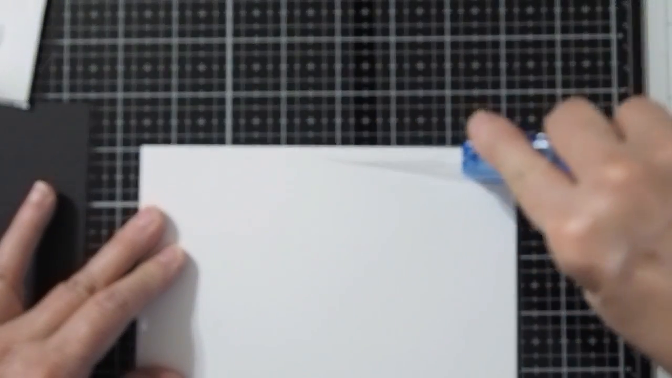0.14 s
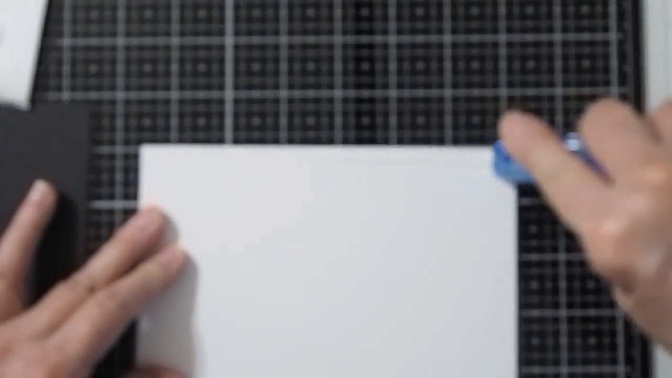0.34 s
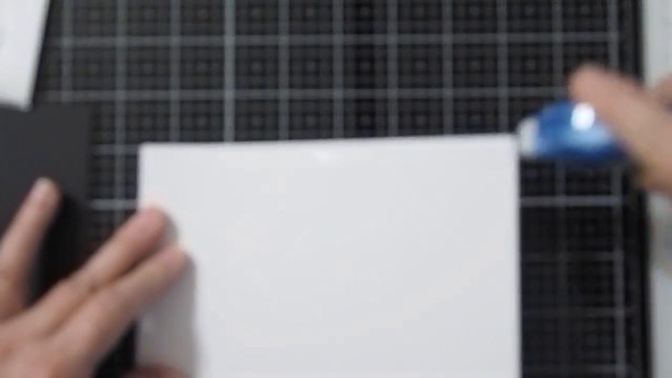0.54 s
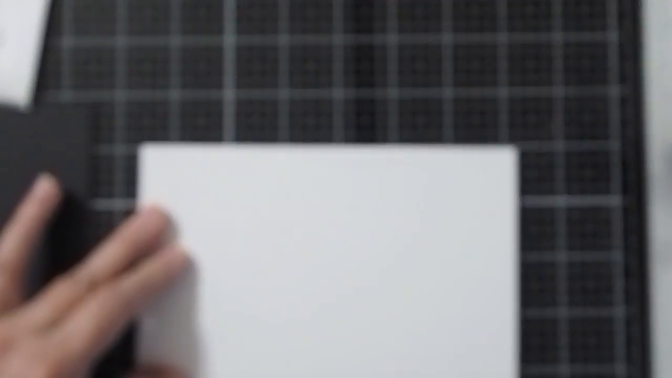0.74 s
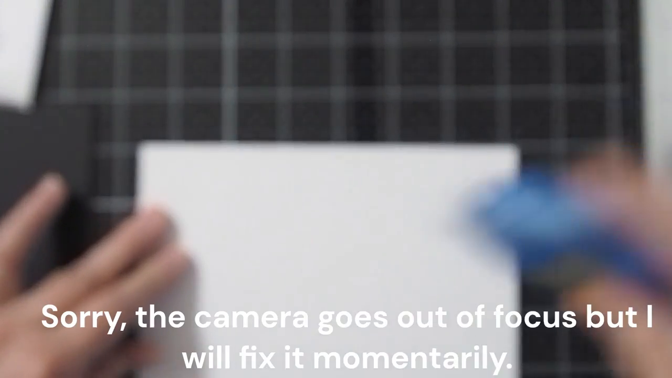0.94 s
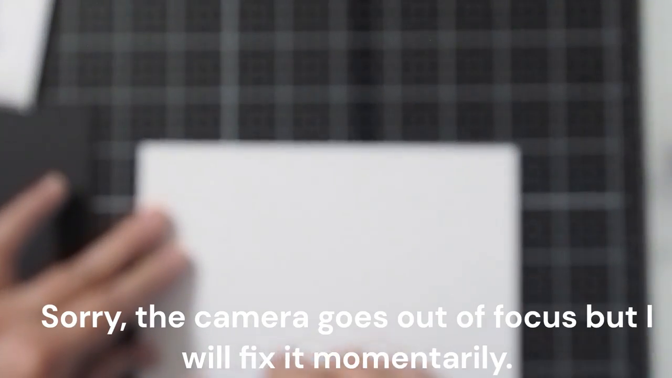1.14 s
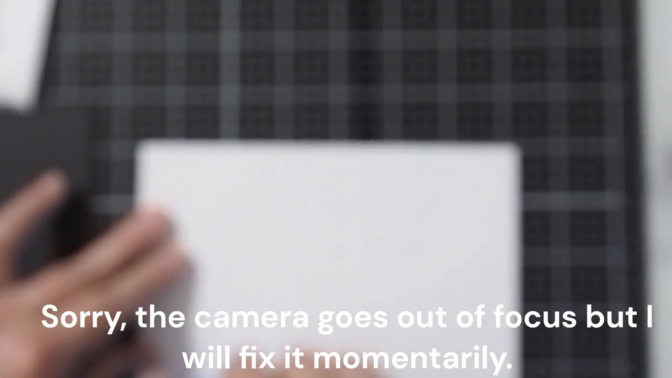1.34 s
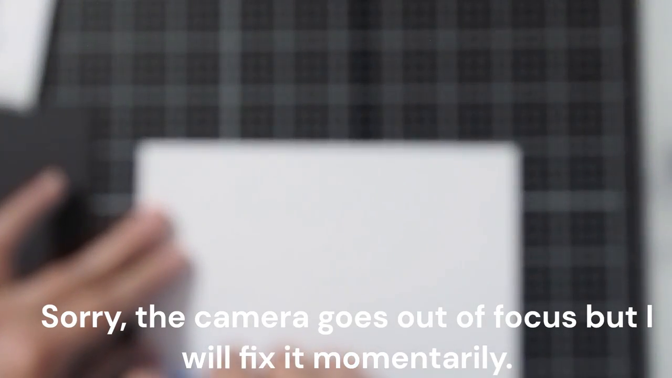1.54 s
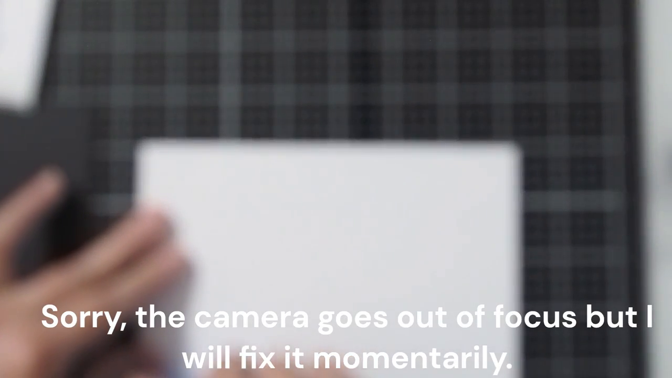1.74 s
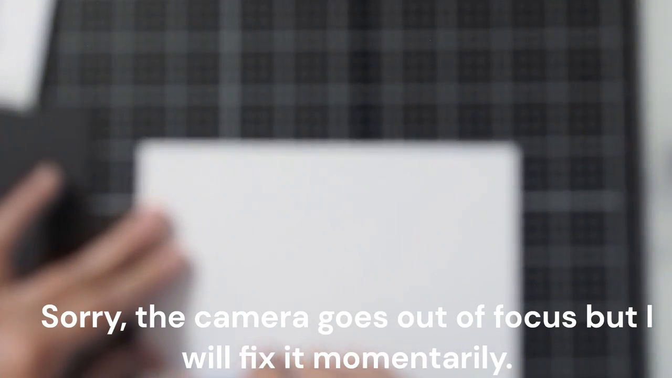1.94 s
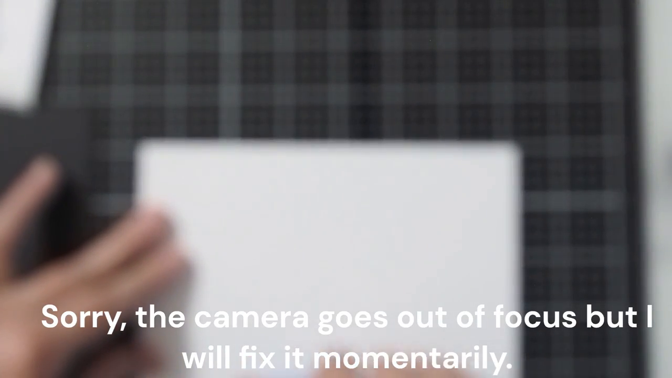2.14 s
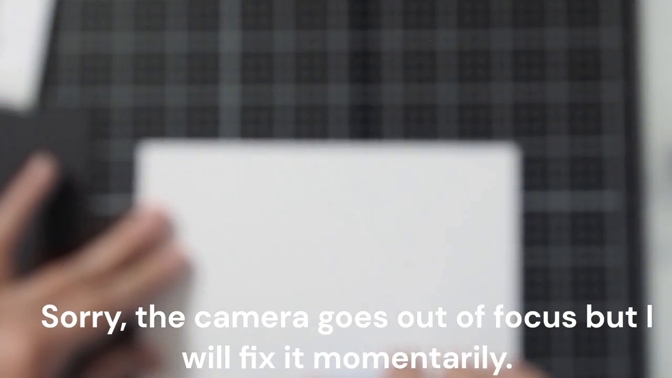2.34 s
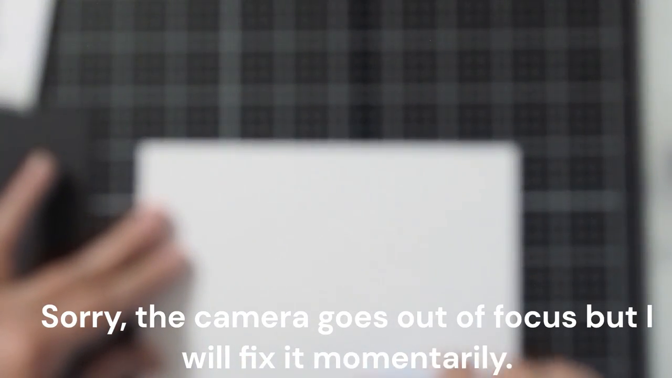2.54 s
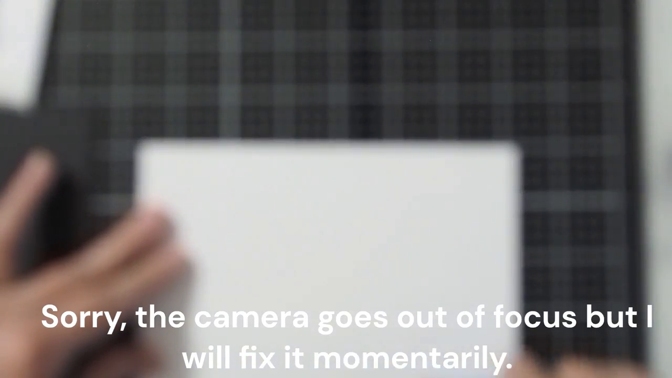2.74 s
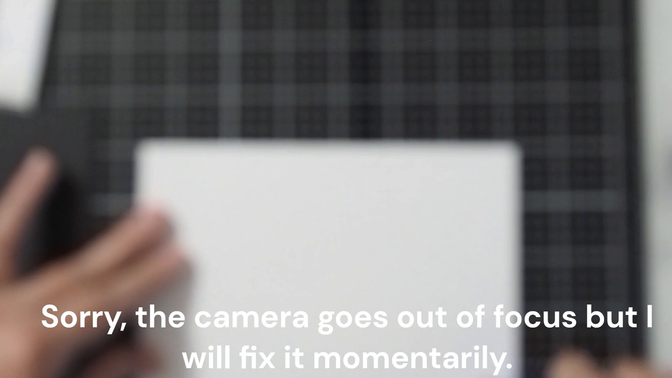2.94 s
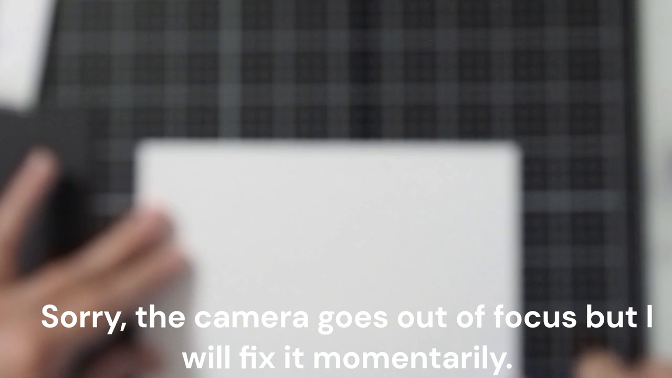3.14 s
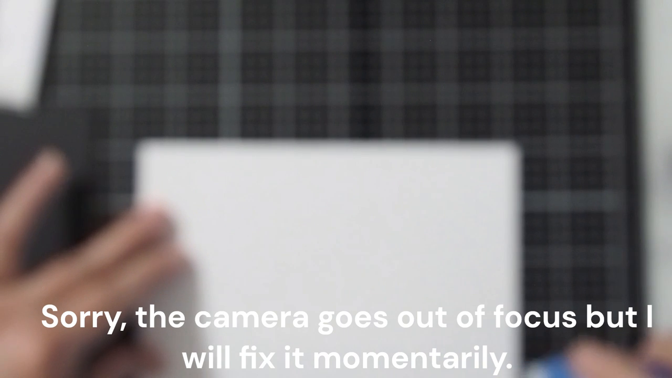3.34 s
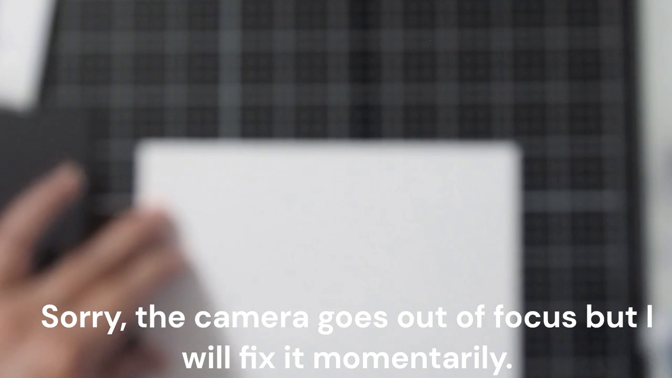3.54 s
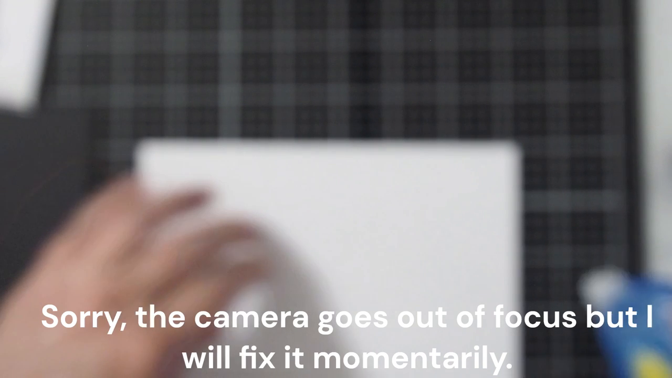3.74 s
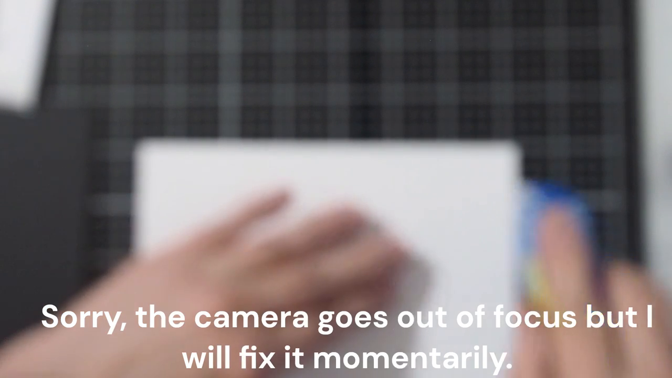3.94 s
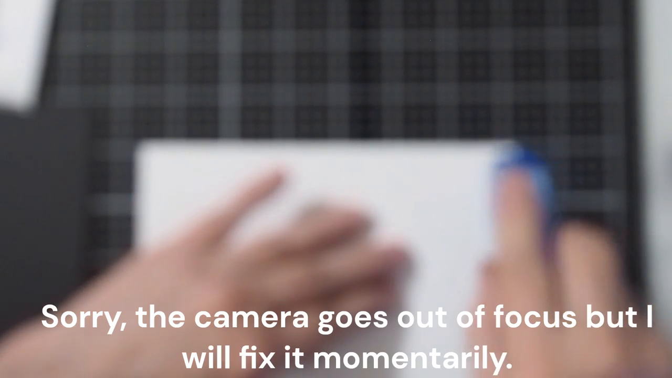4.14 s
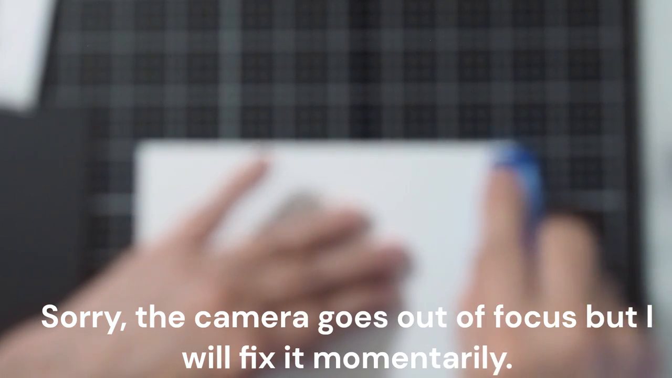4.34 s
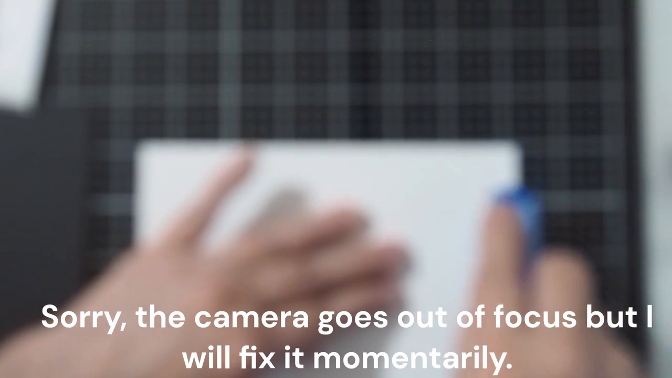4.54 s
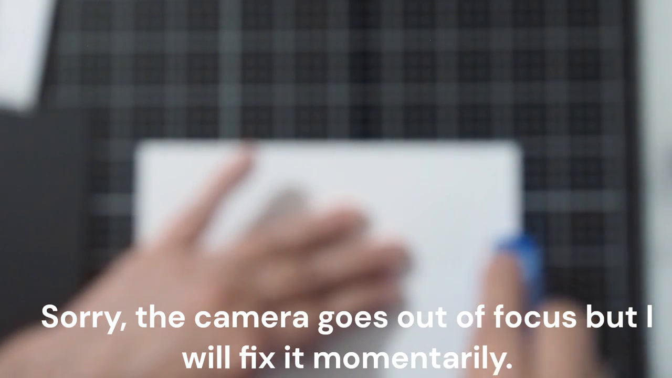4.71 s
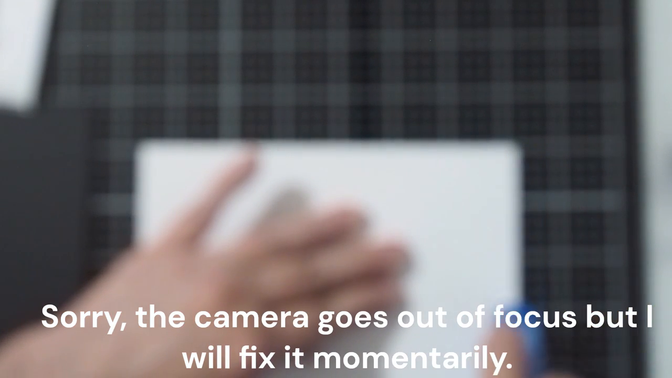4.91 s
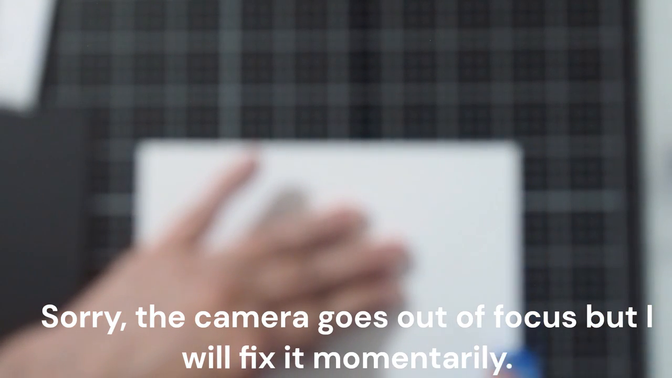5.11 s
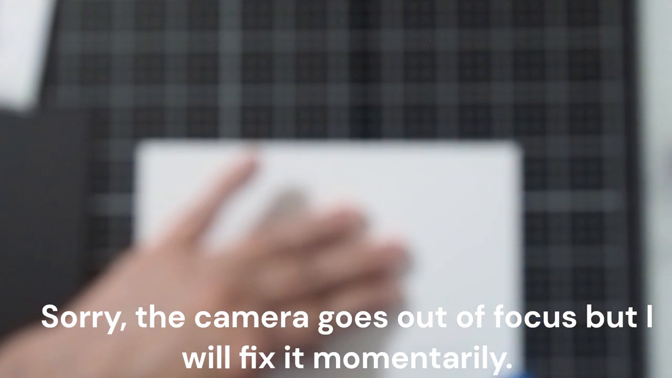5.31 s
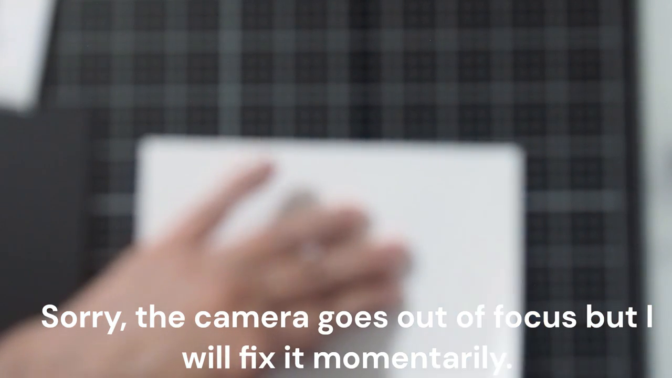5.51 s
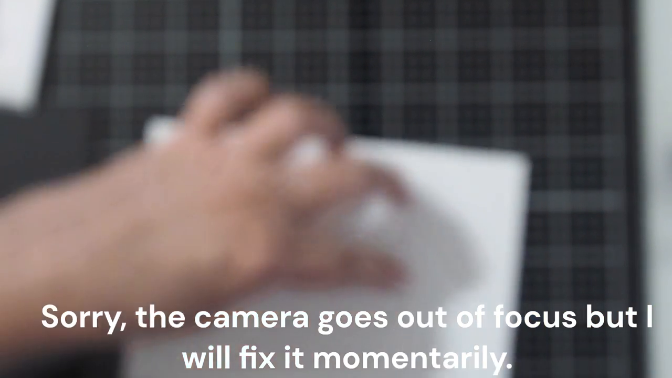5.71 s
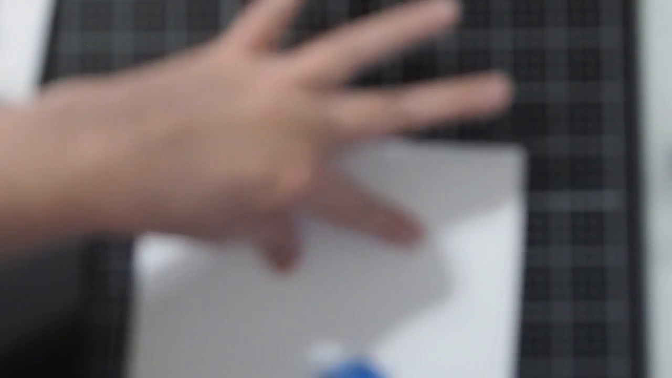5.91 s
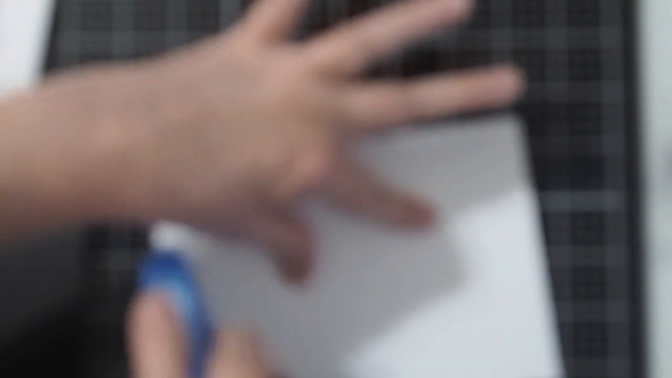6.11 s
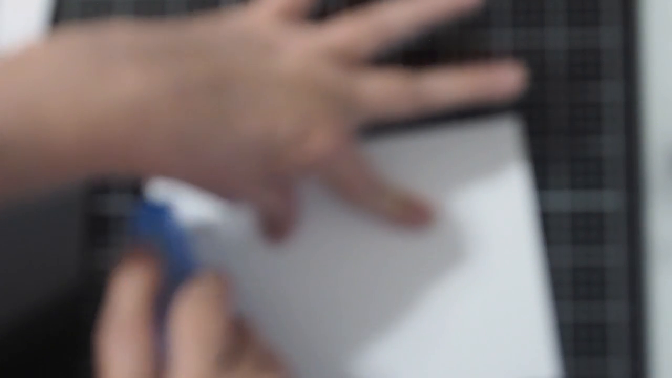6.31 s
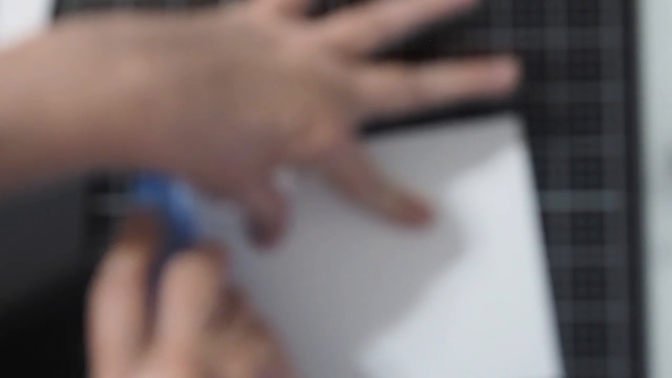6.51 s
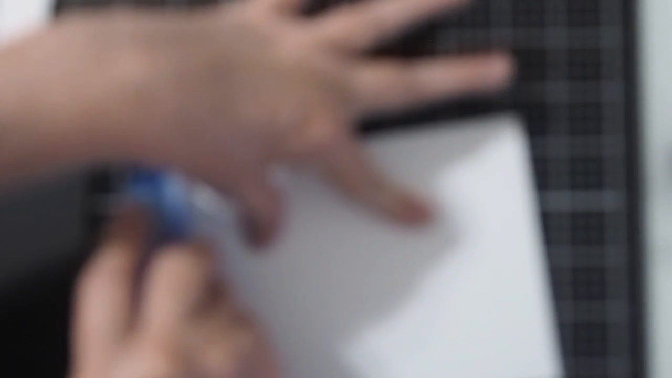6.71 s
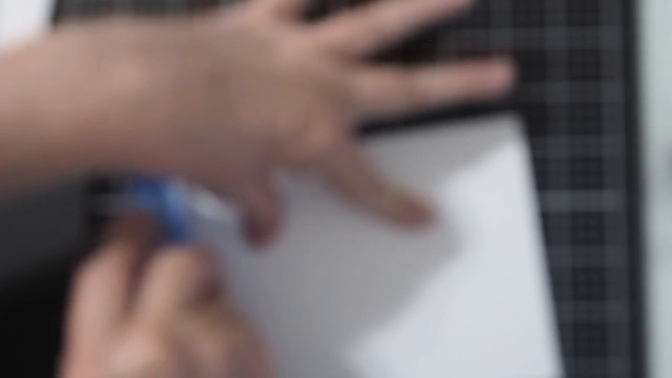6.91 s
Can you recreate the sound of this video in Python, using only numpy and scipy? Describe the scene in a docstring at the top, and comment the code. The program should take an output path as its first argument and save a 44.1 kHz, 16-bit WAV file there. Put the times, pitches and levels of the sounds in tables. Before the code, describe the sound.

A close, quiet tabletop in a small dry room with faint low airy hum. At 0.3 s a bright plastic click lands with a brief paper brush; at 0.5-0.65 s come lighter scuffs and a small tap. Near silence follows until 1.77 s, when a plastic tape runner is pulled: a rapid ratcheting buzz of crisp teeth, swelling and snapping hardest around 2.1-2.3 s, with sticky hiss and hollow card resonance. From 2.57 s it continues much softer, slowing into separate ticks by 3.1 s. A faint brush at 3.2 s and tiny taps lead to a dull table thump at 4.26 s. A second, firmer ratchet rasp runs 4.42-5.1 s, uneven in speed, ending abruptly. Small ticks follow, then a sharp plastic click at 5.57 s, a soft long paper slide from 5.75 to 6.4 s, and muted low taps near 6.65 and 6.9 s.

```python
"""On a craft table in a small room, a plastic tape runner is drawn twice along a paper panel.
Ratchet impacts: speed and hand pressure drive a pawl over the teeth of the spool, with a soft rasp
when slow and light and a sharp snap when fast and firm. Friction noise: peeling tape hisses and a
roller rings the card. Struck bodies: the case knocks as it is set down and lifted. Hands and paper
slide with shaped friction noise, walls add a short diffuse tail, and the room hums faintly."""
import sys
import numpy as np
from scipy import signal
from scipy.fft import rfft, irfft
from scipy.io import wavfile

SR = 44100
rng = np.random.default_rng(int(sys.argv[2]) if len(sys.argv) > 2 else 0)


def dump(signal):
    """Clip the signal to [-1, 1] and save it as 16-bit WAV at the path in sys.argv[1]."""
    limited = np.clip(np.atleast_2d(signal).T, -1, 1)
    pcm = np.round(limited * 32767).astype(np.int16)
    wavfile.write(sys.argv[1], SR, pcm)


N = 306891
TIME = np.arange(N) / SR

# wheel speed in a firm pull, its light run-out and a second pull: time_s, speed_teeth_per_s
WHEEL_SPEED = [
    [(1.7654, 41.9), (1.837, 48.9), (1.937, 48.1), (2.045, 81.7), (2.128, 77.8), (2.355, 62.6),
     (2.442, 46.4), (2.56, 62.3)],
    [(2.567, 64), (2.857, 64), (2.925, 40), (3.015, 40), (3.04, 24.3), (3.11, 24.3)],
    [(4.4203, 33.6), (4.547, 72.2), (4.624, 55.4), (4.78, 90.2), (4.848, 71.5), (4.979, 57.3),
     (5.059, 43.1), (5.101, 15)],
]
# how hard the hand bears on the runner in each pass: time_s, pressure_db
HAND_PRESSURE = [
    [(1.765, -30), (1.81, -10.5), (1.95, -6), (2.06, -3), (2.23, 2.5), (2.4, -0.5), (2.555, -3.5)],
    [(2.567, -17.5), (2.68, -30.5), (2.88, -22), (3.01, -8.5), (3.06, -26), (3.11, -13)],
    [(4.42, -15.5), (4.53, -6.5), (4.65, 0.5), (4.78, -7.5), (4.95, -2.5), (5.05, -5), (5.07, -29)],
]
# how the runner is held in each pass: glue_grip_db, snap_pitch_hz, left_minus_right_db
HOLD = [(-1, 8860, -1.4), (-.5, 9600, 0.5), (5, 8800, 1)]


def motion(usual_teeth_per_s=60):
    """Kinematics: integrated wheel speed gives the tooth times, with the running controls of each pass.

    Returns tooth times (s), speed (doublings), pressure (dB), grip (gain), place along the pass (0-1).
    """
    ticks = []
    speed, press, grip, place = np.zeros((4, N))
    for pace, bearing, (grip_db, _, _) in zip(WHEEL_SPEED, HAND_PRESSURE, HOLD):
        on = (TIME >= pace[0][0]) & (TIME <= pace[-1][0])
        pass_time = TIME[on]
        rate = np.interp(pass_time, *np.transpose(pace))
        teeth = np.cumsum(rate) / SR
        new_tooth = np.diff(np.floor(teeth), prepend=-1) > 0
        ticks.extend(pass_time[new_tooth])
        speed[on] = np.log2(rate / usual_teeth_per_s)
        press[on] = np.interp(pass_time, *np.transpose(bearing))
        grip[on] = amp(grip_db)
        place[on] = teeth / teeth[-1]
    return np.array(ticks), speed, press, grip, place


def held():
    """Piecewise-constant control: grip, snap pitch and balance of the pass under way."""
    starts = [pace[0][0] for pace in WHEEL_SPEED[1:]]
    return np.array(HOLD)[np.searchsorted(starts, TIME)].T


def level(law, speed, press):
    """Power law: gain of one part follows powers of speed and pressure, linear in decibels."""
    usual_db, per_press, per_doubling = law
    return amp(usual_db + per_press * press + per_doubling * speed)


# answer of chatter and snap to the hand, before their trims:
# level_db at the usual speed, slope_db_per_db of pressure, slope_db_per_doubling of speed
RASP_LAW = (-29, 0.47, -3)
SNAP_LAW = (-34, 1.65, 20.5)
# spectra of the chatter, and of the snap before its pitch is scaled: frequency_hz, relative_level_db
RASP_SPECTRUM = [(900, -16.5), (2400, -31), (3300, -3), (4100, -1), (4800, -5.5), (6200, -7), (7300, -3),
                 (8500, -1.5), (9700, -6.5), (10700, -5.5), (11600, -7.5), (13200, 3.5), (14600, -5),
                 (16000, -4.5)]
SNAP_SPECTRUM = [(700, -37), (1300, -16.5), (2200, -20.5), (4000, -16), (6200, -13), (7600, -7), (8300, 3),
                 (8800, -1), (9700, -4), (10900, -5.5), (13000, -10.5), (16000, -49)]
USUAL_SNAP_HZ = 8600


def ratchet(rise_s=0.00055, rasp_s=0.0042, snap_s=0.00035, snap_lag_s=0.00027, snap_crack=0.017,
            scatter_db=1.0, rasp_trim_db=-0.5, snap_trim_db=9.0, seated_db=1.0, likeness=0.58, size=700):
    """Impact excitation: each tooth flicks the pawl, which snaps down and chatters on the next tooth."""
    t = np.arange(size) / SR
    chatter = (1 - np.exp(-t / rise_s)) * np.exp(-(t / rasp_s) ** 2)
    # each click resembles the one before, so the colour drifts as the wheel turns
    kept, fresh = np.sqrt([0.55, 0.45])
    ticks, speed, press, _, _ = motion()
    # once the pawl is pressed into its seat the chatter grows no further
    rasp_gain = level(RASP_LAW, speed, np.minimum(press, seated_db))
    snap_gain = level(SNAP_LAW, speed, press)
    rasps, snaps = np.zeros((2, 2, N))
    rasp, snap = noise(size, likeness), burst(snap_s, likeness)
    for when in ticks:
        now = round(when * SR)
        force = amp(scatter_db * rng.standard_normal())
        rasp = kept * rasp + fresh * noise(size, likeness)
        sign = rng.choice([-1, 1])
        snap = kept * snap + fresh * sign * burst(snap_s, likeness, snap_crack)
        add(rasps, when, force * rasp_gain[now] * chatter * rasp)
        add(snaps, when + snap_lag_s, force * snap_gain[now] * snap)
    _, snap_hz, _ = held()
    rung = np.zeros((2, N))
    for pitch in np.unique(snap_hz):
        spectrum = [(hz * pitch / USUAL_SNAP_HZ, db) for hz, db in SNAP_SPECTRUM]
        rung += colour(snaps * (snap_hz == pitch), spectrum)
    return amp(rasp_trim_db) * colour(rasps, RASP_SPECTRUM) + amp(snap_trim_db) * rung


# answer of peeling and rolling to the hand, before their trims:
# level_db at the usual speed, slope_db_per_db of pressure, slope_db_per_doubling of speed
HISS_LAW = (-42, 0.38, 11)
ROLL_LAW = (-48.5, 0.46, 2.3)
# spectra of the tearing glue and of the roller: frequency_hz, relative_level_db
PEEL_SPECTRUM = [(1500, -35.5), (2250, -7.5), (2600, 1.5), (2900, -1), (3500, -4), (4500, -4), (5400, -6),
                 (6600, -1.5), (7600, 0.5), (8400, -2), (9600, 4), (10900, -4.5), (13000, 0), (16000, -1)]
ROLLER_SPECTRUM = [(150, -32), (350, -17), (600, 8), (850, -9), (1250, -2), (1550, 8), (1900, 8),
                   (2300, -13), (2750, -19), (3400, 3.5), (5000, -5)]
# the card under the roller: its low resonance sinks along a pass, its high one sags in the middle
LOW_START_HZ, LOW_END_HZ, LOW_RING_DB = 1673, 1163, -2
HIGH_EDGE_HZ, HIGH_MIDDLE_HZ, HIGH_RING_DB = 3520, 3400, 2


def tape(hiss_trim_db=-0.5, roll_trim_db=-6.0, ring_trim_db=-6.0, jerk=1.2, jerk_s=0.0057,
         low_width_hz=240, high_width_hz=650, uneven_db=2, uneven_hz=7, roll_grip=0.49):
    """Friction and resonance: glue threads tear while the roller, jerked by each tooth, rings the card."""
    ticks, speed, press, grip, place = motion()
    hiss = grip * level(HISS_LAW, speed, press)
    roll = grip ** roll_grip * level(ROLL_LAW, speed, press)
    since_tick = abs(TIME - ticks[np.searchsorted(ticks, TIME) - 1])
    roll *= (1 + jerk * np.exp(-since_tick / jerk_s)) / np.sqrt(1 + jerk)
    tearing = amp(hiss_trim_db) * hiss * grainy(grain_db=5.0, grain_hz=600, likeness=0.05)
    rolling = grainy(grain_db=4.0, grain_hz=157, likeness=1.0)
    low_hz = LOW_START_HZ + (LOW_END_HZ - LOW_START_HZ) * place
    high_hz = HIGH_EDGE_HZ + (HIGH_MIDDLE_HZ - HIGH_EDGE_HZ) * np.sin(np.pi * place) ** 2
    ring = np.zeros((2, N))
    for db, hz, width_hz in ((LOW_RING_DB, low_hz, low_width_hz), (HIGH_RING_DB, high_hz, high_width_hz)):
        resonance = unit(resonate(resonate(rolling, hz, width_hz), hz, width_hz))
        # the card lies unevenly on the mat, so each resonance comes and goes
        ring += roll * amp(db + uneven_db * drift(uneven_hz)) * resonance
    rumble = colour(roll * grainy(grain_db=0, grain_hz=152, likeness=1.0), ROLLER_SPECTRUM)
    return colour(tearing, PEEL_SPECTRUM) + amp(roll_trim_db) * rumble + amp(ring_trim_db) * ring


# knocks and ticks of the runner, levels relative within each part:
# start_s, table_level_db, card_level_db, card_pitch_hz, case_level_db, tick_level_db, contact_s
KNOCKS = [(0.2929, -62, -48, 950, -34, -38, 0.00057), (0.2951, -52, -34, 950, -20.5, -22, 0.00061),
          (0.5247, -71, -39, 1710, -47, -51, 0.00102), (0.5419, -65, -59, 1600, -39, -36, 0.00048),
          (0.562, -70, -46, 1660, -39, -52, 0.00026), (0.634, -71, -28.5, 1830, -27.5, -31.5, 0.00045),
          (2.0162, -49.5, -35.5, 1420, -42, -40, 0.0012), (2.546, -42.5, -28.5, 1500, -30, -38, .0014),
          (3.624, -68, -52, 1900, -48, -58, .0012), (3.988, -77, -58, 1600, -53.5, -49.5, 0.00048),
          (4.2641, -31, -36, 560, -32.5, -46.5, .0011), (4.529, -44.5, -42.5, 596, -40, -48, 0.00057),
          (5.0624, -56, -33, 1344, -39, -38, 0.0017), (5.131, -70, -50, 1420, -55, -46, .001),
          (5.341, -67, -55, 1600, -51, -46, 0.00048), (5.413, -55, -62, 1600, -56, -45.5, .0011),
          (5.569, -54, -30, 1740, -19.5, -24, 0.00015), (5.784, -64, -44.5, 1650, -51, -53, 0.00078),
          (6.38, -54, -65, 1590, -70, -50, 0.0025), (6.6543, -44.5, -34, 1210, -44, -45.5, 0.0008),
          (6.671, -38.5, -61, 900, -59, -73, .0038), (6.704, -42, -58, 900, -65, -70, 0.003),
          (6.919, -61, -44, 930, -56, -58, 0.0015)]
# modes of the table top under its mat: frequency_hz, relative_level_db, decay_t60_s
TABLE_MODES = [(97, -9.5, 0.14), (203, -47, 0.11), (221.7, 1.5, 0.19), (307, 5, 0.053), (391, 1, 0.22),
               (577, 2, 0.12), (588, 10.5, 0.019), (845, 1, .03), (950, 6.5, 0.019)]
# spectra of the card before its pitch is scaled, the case, and the tick before its tilt:
# frequency_hz, relative_level_db
CARD_SPECTRUM = [(300, -22.5), (750, -3), (1200, -3), (1400, 10.5), (1750, 7.5), (2100, -5), (2500, -13),
                 (4000, -40), (9000, -72)]
CASE_SPECTRUM = [(800, -26), (2200, -5), (2650, 1.5), (3050, 7.5), (3500, 7.5), (3900, 7.5), (4300, 3),
                 (5200, 2), (6500, -23), (12000, -39)]
TICK_SPECTRUM = [(1500, -25), (4500, -35), (5800, 1), (7000, -1.5), (9500, 3), (11000, -0.5), (12500, 1.5),
                 (14500, 2), (16000, -16.5)]
USUAL_CARD_HZ = 1600
# the light parts of every knock bounce back once
REBOUND_S, REBOUND_DB = 0.0097, -17


def knocks(push_per_contact=1.09, brighten_db=5, usual_contact_s=0.00019, size=9000):
    """Modal excitation: a blow rings the table; card, plastic case and tick sound, then bounce once."""
    t = np.arange(size) / SR
    thud = np.zeros(size)
    for k, (hz, db, t60) in enumerate(TABLE_MODES):
        thud += (-1) ** k * amp(db - 60 * t / t60) * np.sin(2 * np.pi * hz * t) / 2
    body, case = np.zeros((2, 2, N))
    for s, table_db, card_db, card_hz, case_db, tick_db, contact_s in KNOCKS:
        # the mat spreads the blow: a long contact favours the low modes
        push = np.exp(-t / (push_per_contact * contact_s) * 2 * np.pi) * t
        thump = signal.fftconvolve(thud, push / push.sum())
        add(body, s, amp(table_db) * np.tile(thump, (2, 1)))
        card = [(hz * card_hz / USUAL_CARD_HZ, db) for hz, db in CARD_SPECTRUM]
        # the shorter the contact, the brighter the tick (dB per octave)
        tilt = brighten_db * np.tanh(2 * np.log2(usual_contact_s / contact_s))
        tick = [(hz, db + tilt * np.log2(hz)) for hz, db in TICK_SPECTRUM]
        for when, force in ((s, 1), (s + REBOUND_S, amp(REBOUND_DB))):
            add(body, when, force * amp(card_db) * colour(burst(contact_s, 0.97, crack=0.58), card))
            add(case, when, force * amp(case_db) * burst(contact_s, 0.59, crack=0.23))
            add(body, when, force * amp(tick_db) * colour(burst(contact_s, 0.15, crack=0.033), tick))
    return body + colour(case, CASE_SPECTRUM)


def stroke(start, length, db, peak, fullness=0.54):
    """Amplitude envelope: an arch that swells to the peak of one slide and fades."""
    # warped time puts the top of the arch at the peak
    u = np.clip((TIME - start) / length, 0, 1) ** (-1 / np.log2(np.clip(peak, 0.05, 0.95)))
    return amp(db) * abs(np.sin(np.pi * u)) ** fullness


# hands and paper sliding, the first row a rattle just after the knock: start_s, length_s, pressure_level_db,
# peak_place (0-1 of the length)
SLIDES = [(0.288, 0.12, -47, 0.5), (0.458, 0.05, -57.5, .45), (.521, 0.0254, -41, 0.52),
          (0.55, 0.096, -53.5, 0.1), (3.223, 0.082, -57.5, .45), (5.548, 0.047, -50, 0.37),
          (5.59, 0.15, -59, 0.2), (5.75, .68, -53.5, 0.4)]
# spectrum of skin and paper on the mat: frequency_hz, relative_level_db
PAPER_SPECTRUM = [(500, -29), (1500, 2), (2300, -1), (3700, 7), (5200, 4), (6800, 0.5), (9000, 4),
                  (13000, 1), (16000, 4)]


def slides(flutter_db=1.0, flutter_hz=40, catch_db=-2, catches_per_s=70, catch_spread_db=3, firm_db=-45):
    """Friction noise: skin and paper brush the mat; the firmer the slide, the louder its catching ticks."""
    pressure = sum(stroke(*row) for row in SLIDES) * amp(flutter_db * drift(flutter_hz))
    caught = rng.random(N) < catches_per_s / SR
    catches = caught * amp(catch_spread_db * rng.standard_normal(N))
    ticks = unit(signal.oaconvolve(catches[None], burst(0.00081, 0.35), axes=1)[:, :N])
    firmness = np.minimum(pressure / amp(firm_db), 1)
    brushing = grainy(grain_db=2.5, grain_hz=352, likeness=0.42)
    return colour(pressure * (brushing + amp(catch_db) * firmness * ticks), PAPER_SPECTRUM)


def hand_echo(x, gain=0.56, delay_s=0.000836, sway=0.25):
    """Comb filtering: the moving hand reflects sound, so shallow notches wander, apart at each ear."""
    late = [np.interp(TIME - delay_s * np.exp(sway * drift(hz=1.97)), TIME, side) for side in x]
    return x + gain * np.array(late)


# room decay: frequency_hz, decay_t60_s
ROOM_DECAY = [(200, 0.1), (1500, 0.23), (4000, 0.091), (9000, 0.16), (16000, 0.033)]


def room(x, first_s=0.0024, size=16384):
    """Diffuse reverberation: walls and table throw back a short decaying tail, different at each ear."""
    taps = rng.standard_normal((2, size)) * (np.arange(size) / SR > first_s)
    hz, t, z = signal.stft(taps, SR, nperseg=128)
    decay = amp(-60 * t / read(ROOM_DECAY, hz)[:, None])
    tail = signal.istft(z * decay, SR, nperseg=128)[1]
    return signal.oaconvolve(x, tail / np.linalg.norm(tail[0]), axes=1)[:, :N]


# spectrum of the room air: frequency_hz, relative_level_db
AIR_SPECTRUM = [(20, -45), (45, -1), (65, -4), (95, -5.5), (140, -3), (220, -10), (295, -5.5), (460, -13.5),
                (750, -13.5), (1110, -4.5), (1500, -16), (2500, -21), (4200, -19), (6000, -29.5),
                (10000, -26), (15500, -31.5)]
# left-right likeness of the air: frequency_hz, likeness (0-1)
AIR_LIKENESS = [(40, 0.88), (120, 0.6), (300, 0.62), (950, 0.66), (2400, 0.1), (6000, 0), (15000, 0)]
# balance of the air: frequency_hz, left_minus_right_db
AIR_BALANCE = [(60, -0.5), (150, 1), (380, 1.0), (950, 4.5), (2380, 0.5), (5980, 0.5), (15000, 0)]
# steady hum in the room: frequency_hz, level_db
HUM = [(123.5, -70), (291, -67)]


def room_air(air_db=-52.5, waver_rad=0.33):
    """Stationary broadband noise: steady fan-like air, with hum lines of wavering phase."""
    hz = np.fft.rfftfreq(N, 1 / SR)
    a, b = rfft(rng.standard_normal((2, N)))
    c = np.clip(read(AIR_LIKENESS, hz), -1, 1)
    lean_db = read(AIR_BALANCE, hz) / 2
    left = a * amp(lean_db)
    right = (c * a + np.sqrt(1 - c ** 2) * b) * amp(-lean_db)
    air = amp(air_db) * unit(irfft(np.array([left, right]) * amp(read(AIR_SPECTRUM, hz)), N))
    hum = sum(amp(db) * unit(np.sin(2 * np.pi * f * TIME + waver_rad * drift(hz=5.5))) for f, db in HUM)
    return air + hum


def grainy(grain_db, grain_hz, likeness):
    """Amplitude modulation: friction noise comes in tiny uneven clumps when grain_db is not zero."""
    return unit(noise(N, likeness) * amp(grain_db * drift(grain_hz)))


def burst(contact_s, likeness, crack=0, size=700):
    """Contact impulse: noise swells and dies; a share (crack) of its energy is one clean impulse."""
    u = np.arange(size) / SR / max(contact_s, 1 / SR)
    shape = u * np.exp(1 - u)
    share = np.clip(crack, 0, 1)
    sound = np.sqrt(1 - share) * unit(noise(size, likeness) * shape) / np.sqrt(size)
    sound[:, np.argmax(shape)] += np.sqrt(share)
    return sound * np.linalg.norm(shape)


def resonate(x, hz, width_hz):
    """Time-varying resonance: a one-pole filter follows the curve hz and keeps the power of white noise."""
    turn = np.exp(2j * np.pi * np.cumsum(hz) / SR)
    r = np.exp(-np.pi * width_hz / SR)
    shifted = signal.lfilter([1], [1, -r], x / turn + 1e-18)
    return np.sqrt(2 * (1 - r ** 2)) * (turn * shifted).real


def colour(x, spectrum, size=2048):
    """Minimum-phase filtering: x passes a causal body of unit energy with the given spectrum."""
    log_gain = np.log(amp(read(spectrum, abs(np.fft.fftfreq(size, 1 / SR)))))
    ring = np.fft.ifft(np.exp(np.conj(signal.hilbert(log_gain)))).real[:size // 2]
    return signal.oaconvolve(x, ring[None] / np.linalg.norm(ring), axes=1)[:, :N]


def noise(size, likeness):
    """Interchannel correlation: white noise in two partly alike channels."""
    a, b = rng.standard_normal((2, size))
    c = np.clip(likeness, -1, 1)
    return np.array([a, c * a + np.sqrt(1 - c ** 2) * b])


def drift(hz):
    """Low-pass random process: chance of unit rms, changing about hz times a second."""
    low_pass = 1 + (np.fft.rfftfreq(N, 1 / SR) / hz) ** 4
    return unit(irfft(rfft(rng.standard_normal(N)) / low_pass, N))


def amp(db):
    """Decibel relation: level to amplitude gain."""
    return 10 ** (np.asarray(db) / 20)


def unit(x):
    """Normalisation: scales to an rms of one."""
    return x / np.sqrt(np.mean(x ** 2) + 1e-20)


def read(points, hz):
    """Interpolation: reads a table on a log-frequency axis."""
    f, value = np.transpose(points)
    return np.interp(np.log(hz + 1), np.log(f + 1), value)


def add(mix, s, sound):
    """Superposition: mixes a stereo sound in at time s."""
    part = mix[:, round(s * SR):][:, :sound.shape[1]]
    part += sound[:, :part.shape[1]]


def scene(runner_room_db=-11, knock_room_db=-7):
    """Direct and reverberant fields: the runner and hands close by, the room around them."""
    _, _, lean_db = held()
    runner = hand_echo(ratchet() + tape()) * amp([lean_db / 2, -lean_db / 2])
    handling = knocks() + slides()
    reverberant = room(amp(runner_room_db) * runner + amp(knock_room_db) * handling)
    return runner + handling + reverberant + room_air()


def record(dry, low_cut_hz=36, edge_hz=16000):
    """Band limiting: the microphone loses the deepest bass, then a low-pass removes the top treble."""
    lean = signal.sosfilt(signal.butter(3, low_cut_hz, "high", fs=SR, output="sos"), dry)
    low_pass = signal.firwin(401, edge_hz, window=("kaiser", 8), fs=SR)
    return signal.oaconvolve(lean, low_pass[None], "same")


dry = scene()
out = record(dry)
dump(out)
```